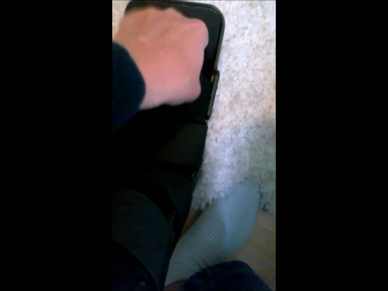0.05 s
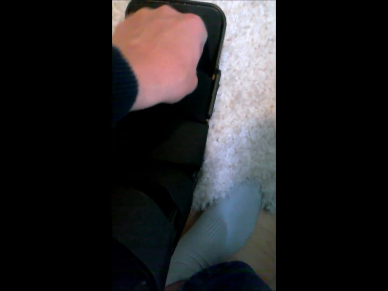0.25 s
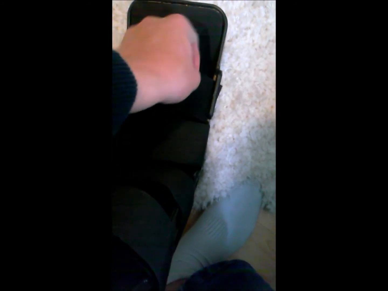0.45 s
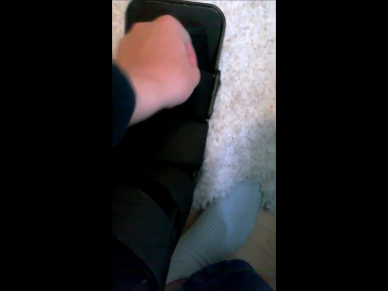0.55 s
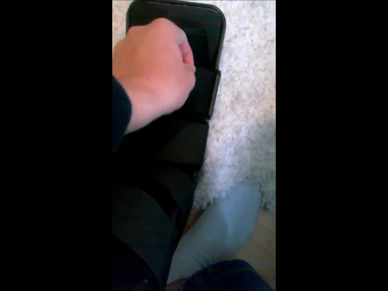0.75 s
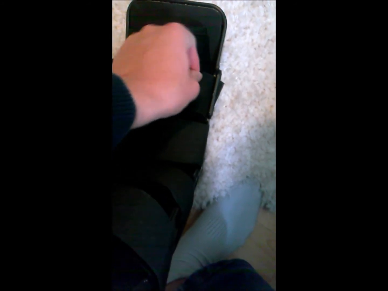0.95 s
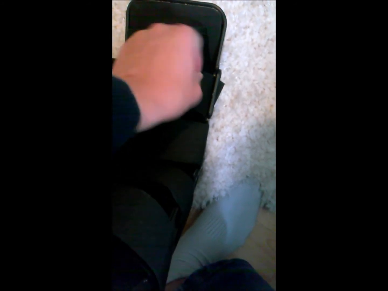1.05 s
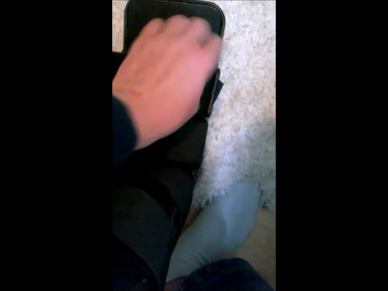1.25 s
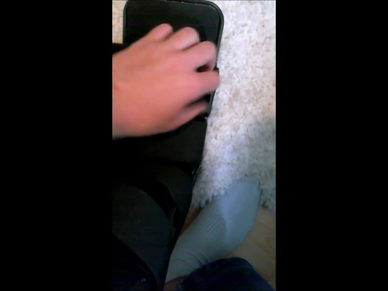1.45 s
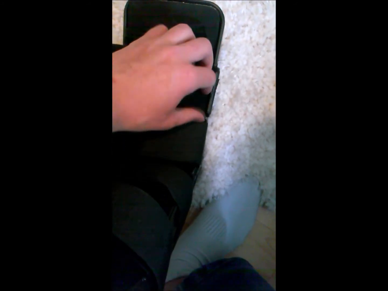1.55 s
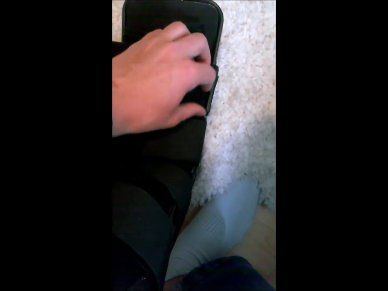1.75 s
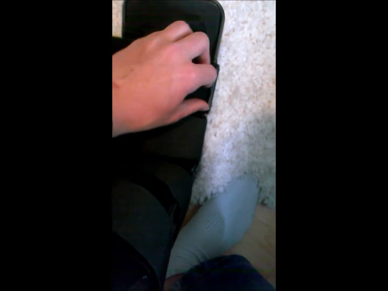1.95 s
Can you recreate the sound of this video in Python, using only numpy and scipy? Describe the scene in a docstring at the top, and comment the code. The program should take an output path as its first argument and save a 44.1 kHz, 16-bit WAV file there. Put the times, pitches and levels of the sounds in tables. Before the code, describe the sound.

A hook-and-loop strap rasps and clicks through a plastic buckle in short, scratchy indoor strokes.

```python
"""The webbing of a hook-and-loop strap rasps in short strokes through a plastic buckle: dense tiny clicks and hiss.
Hooks snap over the buckle's edge as short noise bursts, and knock its frame, which rings as decaying tones.
Hard pulls add a crackle of single hooks. At the end the strap is pressed down: noise crunches in jerks,
a wavering tone squeaks briefly and two low tones make a soft thump.
A low rumble of the hand, a short echo of the carpeted room and its faint background noise lie underneath."""
import sys
import numpy as np
from scipy import signal
from scipy.fft import rfft, irfft
from scipy.io import wavfile

SR = 44100
rng = np.random.default_rng(int(sys.argv[2]) if len(sys.argv) > 2 else 0)


def store_wav(level_fs):
    """Save 16-bit WAV to argv[1]."""
    pcm = np.round(np.clip(np.atleast_2d(level_fs), -1, 1) * 32767)
    wavfile.write(sys.argv[1], SR, pcm.T.astype(np.int16))


N = 88244
T = np.arange(N) / SR  # time of every sample [s]

# Strokes of the webbing: (peak time [s], level [dB], 20 dB rise [s], 20 dB fall [s], treble lift [dB])
STROKES = [(.008, -38.5, .05, .06, 1), (.155, -42, .08, .055, 2), (.185, -43, .04, .026, 2),
           (.335, -57, .14, .08, -7), (.38, -56, .015, .025, -3), (.455, -45, .06, .05, 0),
           (.486, -42, .02, .03, -10), (.523, -51, .04, .06, -7), (.574, -47, .07, .05, -3),
           (.642, -45, .045, .07, -1), (.697, -37.5, .055, .05, -3), (.845, -67, .08, .03, -7),
           (.96, -49, .055, .09, 2), (1.021, -44.5, .05, .03, 2), (1.051, -35, .022, .024, -2),
           (1.162, -53, .03, .045, -6), (1.238, -57, .055, .07, 1), (1.322, -43, .055, .066, -4),
           (1.392, -55, .024, .035, -2), (1.44, -50, .025, .05, 1), (1.483, -39, .035, .085, 0),
           (1.529, -38, .03, .06, 3), (1.569, -42, .035, .024, 3), (1.665, -58, .06, .04, -3),
           (1.91, -49, .05, .14, 3)]
# Hooks catch and let go; the three trims below are added to the levels:
# (time [s], buckle knock [dB], middle crack [dB], top tick [dB])
SNAPS = [(.0101, -38, -33, -37), (.024, -42, -44, -38), (.0333, -37, -44, -42), (.147, -48, -44, -42),
         (.1961, -48, -45, -44), (.3225, -58, -58, -53), (.3795, -50, -56, -50), (.4161, -40, -49, -56),
         (.4522, -45, -46, -39), (.4615, -41, -40, -35), (.4806, -34, -48, -48), (.4845, -35, -48, -50),
         (.5652, -39, -40, -35), (.5909, -42, -42, -35), (.6322, -41, -45, -38), (.6564, -37, -38, -36),
         (.6702, -39, -45, -39), (.6832, -30, -37, -33), (.688, -34, -36, -36), (.6975, -36, -36, -38),
         (.7231, -50, -45, -42), (.9159, -32, -39, -37.5), (.9516, -25, -37, -38), (.968, -43, -41, -43),
         (1.0263, -36, -38, -32), (1.0711, -39, -41, -31), (1.2086, -55, -53, -51), (1.2299, -49, -53, -48),
         (1.2942, -43, -34, -35), (1.2982, -38, -40, -36), (1.3075, -47, -40, -48),
         (1.3232, -36, -31.5, -40), (1.329, -43, -41, -42), (1.3936, -45, -49, -47),
         (1.5196, -20.5, -30, -27), (1.6461, -54, -58, -46), (1.8378, -29.5, -41, -46),
         (1.8889, -47, -39, -37), (1.8954, -44, -42, -40), (1.9213, -42, -39, -39), (1.9658, -42, -39, -38),
         (1.983, -58, -58, -46)]
# Ringing tones of the buckle's frame: (frequency [Hz], relative level [dB], time to fall 60 dB [s])
BUCKLE_MODES = [(760, -3, .009), (920, 0, .009), (1370, -6, .008)]
# Hard pulls: (start [s], end [s], level [dB])
RIPS = [(.415, .72, -51.5), (1.29, 1.335, -49), (1.472, 1.58, -48)]
# Hooks jerk as they bed into the loops: (time [s], level [dB])
SLIPS = [(1.8698, -41), (1.8745, -39), (1.878, -41), (1.8845, -38), (1.9068, -37), (1.9098, -38),
         (1.918, -41), (1.9315, -40), (1.937, -40)]
# Single swells of the crunch, the squeak and the thump:
# (peak time [s], level [dB], 20 dB rise [s], 20 dB fall [s])
PRESS = (1.924, -45.5, .12, .055)
SQUEAK = (1.944, -29, .018, .005)
THUMP = (1.999, -36, .008, .007)
# Low tones of the landing hand: (frequency [Hz], relative level [dB])
THUMP_MODES = [(172, 0), (400, -6)]
# Tone colours of the noises: (frequency [Hz], relative level per Hz [dB])
CRACK_COLOUR = [(100, -38), (550, -21), (1300, -7), (1900, -1), (2550, 0), (4000, -5), (5000, -17),
                (16000, -45)]
TICK_COLOUR = [(100, -40), (3000, -20), (4600, -5), (5300, -4), (6300, 1), (7400, -10), (10000, -19),
               (16000, -35)]
WEBBING_COLOUR = [(40, -35), (100, -22), (160, -12), (310, -7.5), (520, -12), (850, 1), (1450, 0),
                  (1850, -6), (2700, -4), (4800, -6.5), (6300, -2), (7600, -15), (11000, -25), (16000, -40)]
CRUNCH_COLOUR = [(45, -26), (200, -6), (430, 6), (620, 1), (1500, -6), (2400, 2), (3000, -8), (3900, -4),
                 (4900, -19), (16000, -42)]
FLOOR_COLOUR = [(25, -7), (70, -10), (160, 0), (400, -6), (900, -1), (16000, -28)]
HANDLING_COLOUR = [(60, -19), (120, -5), (160, 4), (205, -4), (320, -1), (1500, -19), (16000, -60)]

FLOOR_DB, HANDLING_DB = -78.5, -70
HANDLING_FOLLOWS = .33  # share of the strokes' swing in dB
HANDLING_FADE_DB_PER_S = 4.5  # the grip settles
ROOM_T60_S, ROOM_DB, ROOM_DELAY_S = .11, -11.5, .003
FIBRES_PER_S, HOOKS_PER_S, CLICK_SPREAD_DB = 1700, 450, 3.5
HISS_DB = -4  # compared with the clicks
PATCHY_DB, PATCHY_PER_S = 4.0, 35  # depth and speed of the shifts in colour
JUDDER_DB, PRESS_JUDDER_DB, JUDDER_PER_S = 1.7, 4, 110
TREBLE_HZ = 2500  # a stroke's treble lift works above this
SNAP_S = .004  # span over which a short sound's level counts
KNOCK_TRIM_DB, CRACK_TRIM_DB, TICK_TRIM_DB = -3.2, -2.9, -2.6
CRACK_T60_S, TICK_T60_S, SLIP_T60_S = .015, .013, .016
BUILD_S, BUILD_DB = .0013, 24  # a volley swells by this much before it peaks
KNOCK_LOW_HZ = 650
KNOCK_DETUNE = .04  # typical share by which the grip shifts the frame's tones
PRESS_START_S = 1.838
SQUEAK_HZ, SQUEAK_WAVER = 2620, .1  # pitch, and typical share by which it wavers
CUTOFF_HZ = 16100


def from_db(db):
    """Turn decibels into a gain."""
    return 10 ** (np.asarray(db) / 20)


def rms_one(x):
    """Scale a signal so that its average strength (rms) is 1."""
    return x / np.sqrt(np.mean(x ** 2) + 1e-20)


def colour(x, spectrum, size=2048):
    """Filter a sound to a tone colour, never sounding ahead of it; white noise keeps its power."""
    hz, db = np.transpose(spectrum)
    grid = np.log(np.fft.rfftfreq(size, 1 / SR) + 1)
    gain = from_db(np.interp(grid, np.log(hz), db))
    # Keeping only the first half of the cepstrum puts the response after time zero.
    cepstrum = irfft(np.log(gain))[:size // 2]
    response = irfft(np.exp(2 * rfft(cepstrum, size)))
    response = response / np.linalg.norm(response)
    return signal.fftconvolve(x, response)[:len(x)]


def drift(rate):
    """Smooth random wandering with spread 1; a higher rate [Hz] wanders faster."""
    r = np.exp(-2 * np.pi * rate / SR)
    return rms_one(signal.lfilter([1], [1, -2 * r, r * r], rng.standard_normal(N)))


def swell(peak_s, db, rise_s, fall_s):
    """Gain that rises to a peak and falls away, straight in dB."""
    distance = np.maximum((peak_s - T) / rise_s, (T - peak_s) / fall_s)
    return from_db(db - 20 * distance)


def add(out, s, db, sound):
    """Place a short sound at a time and level."""
    i = max(int(s * SR), 0)
    scaled = from_db(db) * np.sqrt(SNAP_S * SR) * sound / np.linalg.norm(sound)
    out[i:i + len(sound)] += scaled[:N - i]


def patchy(x, count=26):
    """As the weave shifts, narrow bands swell and fade independently and change the colour."""
    hz = np.fft.rfftfreq(N, 1 / SR)
    place = np.interp(np.log(hz + 1), np.log([300, 14000]), [0, count - 1])
    spectrum = rfft(x)
    out = np.zeros(N)
    for k in range(count):
        overlap = np.maximum(1 - abs(place - k), 0)  # neighbouring bands blend
        band = irfft(spectrum * overlap, N)
        out += band * from_db(PATCHY_DB * drift(PATCHY_PER_S))
    return rms_one(out)


def floor():
    """Steady coloured noise makes the quiet of the room."""
    return from_db(FLOOR_DB) * colour(rng.standard_normal(N), FLOOR_COLOUR)


def room(x):
    """The walls return a short, faint tail, made of fading noise."""
    tail = rng.standard_normal(N) * from_db(-60 * T / ROOM_T60_S) * (T > ROOM_DELAY_S)
    return from_db(ROOM_DB) * signal.fftconvolve(x, tail / np.linalg.norm(tail))[:N]


def handling(effort):
    """The hand rumbles along with the strokes, but swings less in level."""
    level = rms_one(effort ** HANDLING_FOLLOWS * from_db(-HANDLING_FADE_DB_PER_S * T))
    return from_db(HANDLING_DB) * level * colour(rng.standard_normal(N), HANDLING_COLOUR)


def thump():
    """The hand lands softly: low tones under one quick swell."""
    tones = sum(from_db(db) * np.sin(2 * np.pi * hz * T) for hz, db in THUMP_MODES)
    return np.sqrt(2) * swell(*THUMP) * tones


def squeak():
    """The strap squeaks: one tone with a rapidly wavering pitch."""
    pitch = SQUEAK_HZ * (1 + SQUEAK_WAVER * drift(500))
    tone = np.sin(2 * np.pi * np.cumsum(pitch) / SR)
    return np.sqrt(2) * swell(*SQUEAK) * tone


def slips(size=1600):
    """Under the hand the hooks give way in coarse, uneven jerks of fading noise."""
    out = np.zeros(N)
    fade = from_db(-60 * T[:size] / SLIP_T60_S)
    for s, db in SLIPS:
        add(out, s, db, colour(rng.standard_normal(size) * fade, CRUNCH_COLOUR))
    return out


def fibres():
    """Fibres make dense tiny clicks of uneven size over a smooth hiss, with shifting colour."""
    sizes = from_db(CLICK_SPREAD_DB * np.minimum(rng.exponential(1, N), 4))
    signs = rng.choice([-1, 1], N)
    clicks = sizes * signs * (rng.random(N) < FIBRES_PER_S / SR)
    return patchy(rms_one(clicks) + from_db(HISS_DB) * rng.standard_normal(N))


def press():
    """Hooks crunch into the loops as a juddering swell of fibre noise with jerks."""
    contact = np.clip((T - PRESS_START_S) / .01, 0, 1)
    judder = from_db(PRESS_JUDDER_DB * drift(JUDDER_PER_S))
    return colour(fibres() * contact * swell(*PRESS) * judder, CRUNCH_COLOUR) + slips()


def buckle_knock(after):
    """A knock sets the plastic frame ringing at a few tones that die away quickly."""
    strength = rng.normal(0, 1.5, len(BUCKLE_MODES))  # uneven from knock to knock [dB]
    detune = 1 + KNOCK_DETUNE * rng.standard_normal()
    knock = np.zeros(len(after))
    for k, (hz, db, t60) in enumerate(BUCKLE_MODES):
        fade = from_db(db + strength[k] - 60 * after / t60)
        knock += (-1) ** k * fade * np.sin(2 * np.pi * hz * detune * after)
    no_bass = signal.butter(4, KNOCK_LOW_HZ, "high", fs=SR, output="sos")
    return signal.sosfilt(no_bass, knock)


def snaps(size=1600):
    """Each snap is a quick noisy volley of hooks letting go, and a knock on the buckle."""
    out = np.zeros(N)
    t = T[:size] - BUILD_S
    after = np.maximum(t, 0)
    build = from_db(BUILD_DB * np.minimum(t, 0) / BUILD_S)
    crack_shape = build * from_db(-60 * after / CRACK_T60_S)
    tick_shape = build * from_db(-60 * after / TICK_T60_S)
    for s, knock_db, crack_db, tick_db in SNAPS:
        crack = colour(rng.standard_normal(size) * crack_shape, CRACK_COLOUR)
        tick = colour(rng.standard_normal(size) * tick_shape, TICK_COLOUR)
        start_s = s - BUILD_S
        add(out, start_s, knock_db + KNOCK_TRIM_DB, buckle_knock(after))
        add(out, start_s, crack_db + CRACK_TRIM_DB, crack)
        add(out, start_s, tick_db + TICK_TRIM_DB, tick)
    return out


def rip():
    """During hard pulls, single hooks crackle as random clicks of uneven size."""
    sizes = from_db(CLICK_SPREAD_DB * rng.standard_normal(N)) * rng.choice([-1, 1], N)
    clicks = patchy(sizes * (rng.random(N) < HOOKS_PER_S / SR))
    pull = sum(from_db(db) * (T > start_s) * (T < end_s) for start_s, end_s, db in RIPS)
    return colour(clicks * pull, WEBBING_COLOUR)


def stroke_levels():
    """Strokes add up by power to one level for the lows and one for the treble."""
    gains = np.array([swell(*row[:4]) for row in STROKES])
    lifts = from_db([row[4] for row in STROKES])[:, None]
    return np.linalg.norm(gains, axis=0), np.linalg.norm(gains * lifts, axis=0)


def webbing(effort, bright):
    """The strap judders through the buckle; its fibre noise follows the strokes."""
    rasp = fibres() * from_db(JUDDER_DB * drift(JUDDER_PER_S))
    low = signal.sosfilt(signal.butter(1, TREBLE_HZ, fs=SR, output="sos"), rasp)
    treble = rasp - low
    return colour(low * effort + treble * bright, WEBBING_COLOUR)


def scene():
    """Strap, buckle and hand sound over the quiet of the room."""
    effort, bright = stroke_levels()
    strap = webbing(effort, bright) + rip() + snaps() + press() + squeak()
    close = strap + thump() + handling(effort)
    return (close + room(close) + floor())[None]


def record(dry):
    """A steep filter cuts the very top of the treble."""
    return signal.sosfilt(signal.ellip(10, .2, 70, CUTOFF_HZ, fs=SR, output="sos"), dry)


dry = scene()
out = record(dry)
store_wav(out)
```